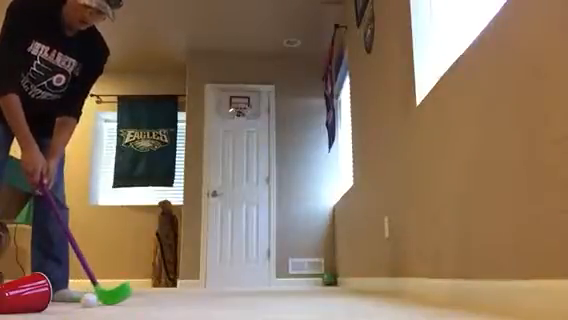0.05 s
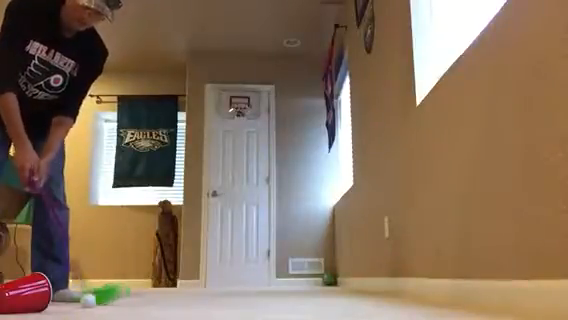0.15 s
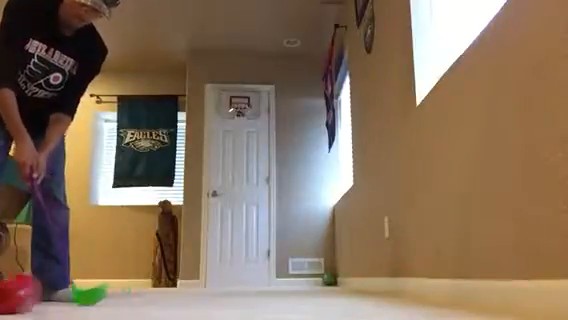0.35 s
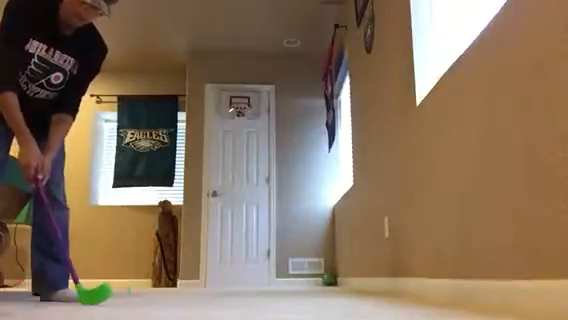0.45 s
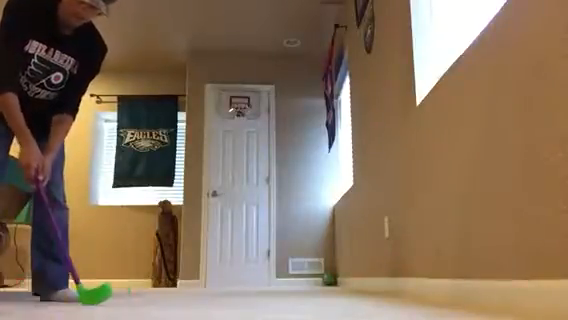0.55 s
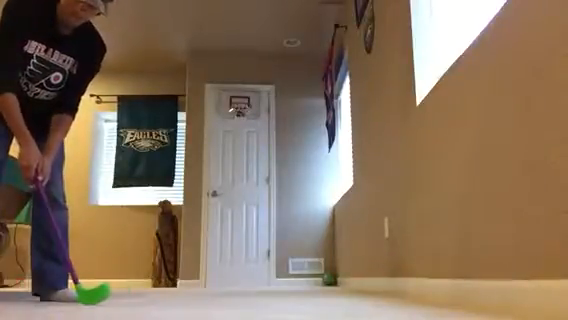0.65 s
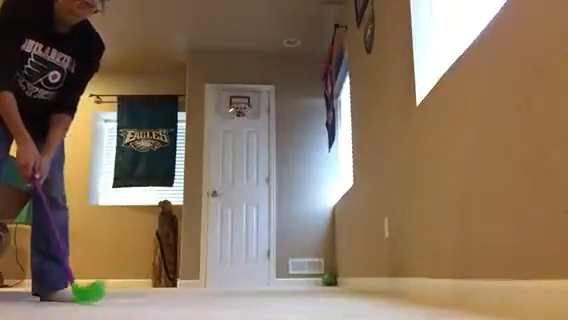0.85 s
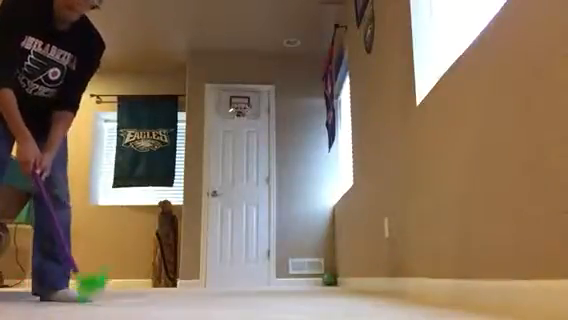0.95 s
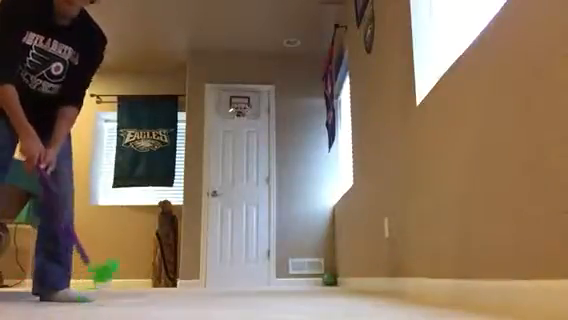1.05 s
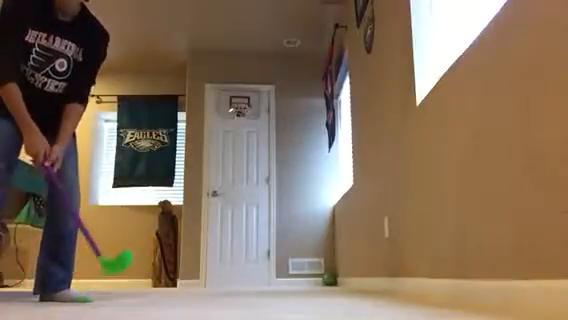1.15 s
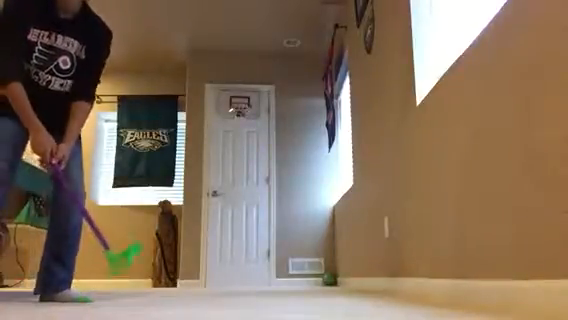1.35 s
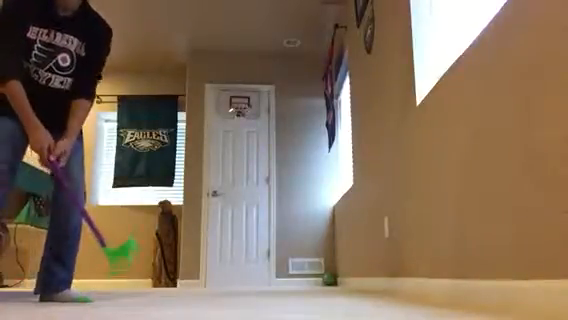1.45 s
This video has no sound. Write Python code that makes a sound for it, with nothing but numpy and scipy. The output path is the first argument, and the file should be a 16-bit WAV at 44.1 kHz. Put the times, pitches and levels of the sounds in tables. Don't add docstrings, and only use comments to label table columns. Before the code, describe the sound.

Hollow plastic ball knocks loudly into a plastic cup after a club tap, then rattles out

```python
import sys
import numpy as np
from scipy import signal
from scipy.fft import rfft, irfft, next_fast_len
from scipy.io import wavfile
from scipy.ndimage import map_coordinates

SR = 44100
rng = np.random.default_rng(int(sys.argv[2]) if len(sys.argv) > 2 else 0)


def file_out(sig):
    cols = np.atleast_2d(sig).T
    lim = np.clip(cols, -1, 1)
    pcm = np.round(lim * 32767).astype(np.int16)
    wavfile.write(sys.argv[1], SR, pcm)


def undo_db(level):
    steps = np.asarray(level, float) / 20
    return 10 ** steps


N = 66150
T = np.arange(N) / SR

# [t/s, air level/dB, rim level/dB, click level/dB, ring length factor]
KNOCKS = [
    (.3362, -9, -10, -27.5, 0.29),
    (.3438, -16, -15, -29.5, 0.3),
    (0.421, -12.5, -21, -29.5, 0.68),
    (0.4867, -14.5, -24.5, -31.5, 0.8),
    (.4985, -30, -62, -48, 1),
    (.535, -33, -41, -56, 0.96),
]
# [f/Hz, level/dB, t60/s]
CUP_AIR = [(262, -17.5, 0.052), (410, -19, .05), (718, 1, 0.065), (882, -22, 0.28)]
# [f/Hz, level/dB, t60/s]
RIM = [(1008, -11.5, 0.07), (1403, -15.5, 0.069), (1567, -23.5, 0.15), (1907, -21, 0.07),
       (2060, -23, 0.058), (2270, -24.5, 0.054),
       (1172, 1, .056), (1254, 0, .036),
       (2800, -24.5, .04), (3350, -23, .04)]
# [f/Hz, width/Hz, level/dB]
WALLS = [(300, 200, 4.5), (915, 230, 3), (1300, 360, 1.5), (1556, 120, 10), (2100, 540, -4),
         (3100, 500, -21)]
# [f/Hz, level/dB, t60/s]
PLASTIC = [(1010, 4, .04), (1190, 6, .04), (1960, 0, .08), (2105, 2, .13), (2256, 0, .11), (2950, -4, .18),
           (3289, -8, .08), (3950, -6, .07), (4258, -11, .1), (5350, -6, .06), (5850, -10, .08),
           (6508, -10, .11), (6850, -11, .08), (8800, -8, .045)]
# [f/Hz, level/dB]
CRACK = [(700, -27), (2000, -6), (4000, -2.5), (6000, 5), (9000, 2), (10300, -6.5), (12500, 1), (16000, -6)]
# [f/Hz, width/Hz, level/dB]
SHELL = [(2100, 110, 6.5), (3070, 730, 3), (3930, 1400, 3.5), (5604, 660, 3.5), (6770, 900, -0.5),
         (9330, 1200, -3.5), (12120, 2100, -7), (15200, 580, -14.5)]
# [t/s, body level/dB, click level/dB]
TAP = (.2352, -12.5, -25.5)
# [f/Hz, level/dB, t60/s]
CLUB = [(147.1, -20, 0.06), (250, -20, 0.05), (335, -19, 0.06), (511, -19, .09), (605, -1.5, 0.09),
        (904, -11, 0.035), (1500, -24, 0.03)]
# [f/Hz, level/dB, t60/s]
REBOUND = [(1410, 6.5, .015), (2300, -3, .012)]
# [f/Hz, width/Hz, level/dB]
CARPET = [(193, 150, 2), (423, 340, -6), (1420, 460, -11), (2150, 1600, -22)]
# [t/s, floor thump level/dB, air level/dB, rim level/dB, click level/dB]
BOUNCES = [(.677, -43, -46, -62, -60), (0.694, -42, -76, -71, -62), (0.7097, -65, -67, -59, -52),
           (.726, -64, -54, -56, -50), (0.7467, -66, -57, -72, -53.5), (.758, -47, -66, -62, -52.5),
           (.773, -57, -42, -54, -54.5), (0.779, -42, -56, -50, -63), (.802, -63, -38, -47, -47.5),
           (0.813, -60, -47, -48, -56), (.838, -46, -48, -54, -58), (0.847, -41.5, -68, -49, -76),
           (0.8645, -35, -37.5, -44.5, -47.5), (0.877, -39, -46, -46, -66), (.891, -48, -43, -46, -53),
           (0.902, -68, -46.5, -43, -59), (0.9215, -49, -48, -40.5, -54.5),
           (0.9304, -77, -32.5, -35.5, -44), (.941, -62, -36, -50, -48.5), (.949, -51, -38, -36.5, -70),
           (.962, -54, -48.5, -43.5, -76), (.988, -65, -56, -61, -68), (1.038, -61, -64, -72.5, -72),
           (1.3587, -61, -69, -60.5, -52)]
# [f/Hz, level/dB, t60/s]
THUMP = [(362, 0.0044, 0.02)]
# [f/Hz, level/dB, t60/s]
DAMPED_AIR = [(545.5, -11, 0.05), (645, -9, .05), (715, 2, 0.035)]
# [f/Hz, level/dB, t60/s]
DAMPED_RIM = [(1053, 0, 0.04), (1163, -0.5, 0.066), (1241, -3, 0.097), (1540, -11.5, 0.079),
              (2000, -19, 0.022), (2807, -14.5, 0.035)]
# [t/s, level/dB, t60/s]
FREE_AIR = [(.778, -41.5, 0.061), (.9415, -38, 0.14), (1.04, -56.5, 0.051)]
# [t/s, f/Hz, level/dB, t60/s]
TICKS = [(1.004, 14500, -66, .012), (1.004, 12000, -66, .012), (1.025, 6030, -56, 0.032),
         (1.358, 4710, -54.5, 0.046), (1.358, 3100, -57, 0.051)]
# [t/s, level/dB]
SCRAPE = [(0.6, -62.5), (0.76, -50), (0.828, -49), (0.896, -46.5), (.97, -54), (1.04, -79), (1.12, -81)]
# [f/Hz, width/Hz, level/dB]
HOLLOW = [(330, 33, 1), (548, 80, 0.5), (644, 19, 10), (1080, 780, -3), (1140, 160, 5), (1680, 447, -12),
          (1900, 230, -4)]
# [t/s, whistle level/dB, whistle f/Hz, hiss level/dB]
ROLL = [(1.0, -96, 2367, -90), (1.06, -68, 2390, -66.5), (1.111, -74, 2399, -65.5),
        (1.139, -61.5, 2470, -66), (1.23, -67.5, 2400, -69.5), (1.303, -71, 2450, -73.5),
        (1.38, -60.5, 2484, -63), (1.459, -70, 2640, -67.5), (1.5, -78, 2670, -74.5)]
# [f/Hz, width/Hz, level/dB]
BALL = [(2390, 560, 1.5), (3720, 540, 2.5), (5700, 820, -1), (8300, 790, -8), (11000, 900, -15)]
# [t/s, boom level/dB]
BOOM = [(0.0, -61.5), (0.136, -71), (0.242, -46), (0.312, -50.5), (0.408, -59), (0.426, -47), (0.5, -46),
        (0.614, -68), (0.714, -46.5), (0.93, -72), (1.002, -57), (1.026, -63), (1.214, -62), (1.256, -59),
        (1.282, -64), (1.424, -63), (1.454, -69.5), (1.5, -65)]
# [t/s, rise/s, t60/s, level/dB]
SCUFF = (1.358, .03, .3, -58)
# [f/Hz, level/dB per Hz]
SHOE = [(120, -42), (230, -16.5), (310, 1.5), (450, -6), (900, -12), (3000, -21), (6000, -17), (16000, -29)]
# [f/Hz, t60/s]
ROOM = [(100, 0.85), (500, 0.45), (2000, 0.5), (6000, 0.37), (14000, 0.2)]
# [f/Hz, level/dB per Hz]
HUSH = [(59, -44.5), (100, -13.5), (177, -29), (215, -4.5), (283, -17), (398, -15), (481, -21), (1830, -22),
        (16000, -32.5)]

RIM_LAG_S, RIM_RISE_S, RIM_CHOKE = 0.011, 0.0013, 1.084
AIR_LAG_S, AIR_RISE_S, AIR_CHOKE = 0.0013, 0.001, 1.15
AIR_HZ, AIR_T60_S = 539.3, 0.22
BUZZ_DB, BUZZ_T60_S = -21.5, 0.22
SCATTER_DB, PLASTIC_SCATTER_DB, RATTLE_SCATTER_DB = 1.3, 3.5, 2
PLASTIC_DB, FLECK_DB, FLECK_SHORTER = -5, -5.5, 0.42
CLICK_T60_S, FIZZ_T60_S, FIZZ_DB = 0.008, 0.15, -14
SOFT_HZ, HARD_HZ = 6000, 14000
DETUNE, FLUTTER_HZ = 0.02, 90
PUSH_HZ, PUSH_DB, PUSH_S, PUSH_PEAK_S, PUSH_LAG_S = 465, -10.5, 0.0016, 0.0023, 0.0029
THUD_DB, THUD_T60_S = -28, 0.17
BRUSH_S, BRUSH_DB = 0.013, -50
REBOUND_S, REBOUND_DB = 0.0113, -8
BUMP_DB, BUMPS_PER_S, SCRAPE_HISS_DB = 2.5, 110, -11
WHISTLE_WANDER_HZ = 420
BOOM_HZ, BOOM_SWAY_HZ = 75.05, 6
WALL_S, WALL_DB = 0.0113, -23.5
ROOM_DB, ROOM_RING_DB = -5, -9
HUSH_DB, TOP_HZ = -75, 16750


def unit(x):
    return x / np.sqrt(np.mean(x ** 2) + 1e-20)


def along(points, hz):
    f, v = np.transpose(points)
    return np.interp(np.log(hz + 1), np.log(f + 1), v)


def level(rows):
    s, db = np.transpose(rows)
    return undo_db(np.interp(T, s, db, left=-120, right=db[-1]))


def wobble(rate_hz):
    return map_coordinates(rng.standard_normal(int(N * rate_hz / SR) + 4), [T * rate_hz])


def filtered(x, response):
    m = next_fast_len(len(x) + 8192)
    return irfft(rfft(x, m) * response(np.fft.rfftfreq(m, 1 / SR)), m)[:len(x)]


def dull(x, hz):
    return filtered(x, lambda f: 1 / (1 + 1j * f / hz))


def resonant(peaks, order=1, size=N):
    def response(f):
        total = 0
        for k, (centre, width, db) in enumerate(peaks):
            damping = 1j * f * width
            total = total + (-1) ** k * undo_db(db) * damping / (centre * centre - f * f + damping)
        return total ** order
    return unit(filtered(rng.standard_normal(size), response))


def coloured(spectrum, size=N):
    return unit(filtered(rng.standard_normal(size), lambda hz: undo_db(along(spectrum, hz))))


def ringing(modes, rise_s, choke, scatter_db=SCATTER_DB, detune=0, flutter=0):
    t = T[:SR // 4, None]
    hz, db, t60 = np.transpose(modes)
    scatter, shift = rng.standard_normal((2, len(hz)))
    knots = rng.standard_normal((FLUTTER_HZ, len(hz)))
    knot_at = np.arange(FLUTTER_HZ)
    shake = np.transpose([np.interp(t[:, 0] * FLUTTER_HZ, knot_at, k - k[0]) for k in knots.T])
    wave = np.sin(2 * np.pi * hz * (1 + detune * shift) * t + flutter * shake)
    wave = wave * (1 + flutter * shake[:, ::-1] / 3)
    decay = undo_db(db + scatter_db * scatter - 60 * (t / t60) ** choke)
    return (decay * wave).sum(1) * (1 - np.exp(-t[:, 0] / rise_s))


def add(track, s, sound):
    track[round(s * SR):][:len(sound)] += sound


def click():
    t = T[:SR // 4]
    crack = coloured(CRACK, size=len(t))
    fizz = resonant(SHELL, order=2, size=len(t))
    return crack * undo_db(-60 * t / CLICK_T60_S) + fizz * undo_db(FIZZ_DB - 60 * t / FIZZ_T60_S)


def knocks():
    out = np.zeros(2 * N)
    for s, air_db, rim_db, click_db, longer in KNOCKS:
        add(out, s, undo_db(click_db) * dull(click(), HARD_HZ))
        plastic = ringing(PLASTIC, 0.0008, 0.75, PLASTIC_SCATTER_DB, 0.004, flutter=1.3)
        add(out, s, undo_db(click_db + PLASTIC_DB) * plastic)
        buzz_gain = undo_db(air_db + BUZZ_DB - 60 * T / BUZZ_T60_S) * (1 - np.exp(-T / 0.0065))
        add(out, s, buzz_gain * resonant(WALLS))
        air = ringing(CUP_AIR, AIR_RISE_S, 0.88)
        air = air + ringing([(AIR_HZ, -2, AIR_T60_S * longer)], AIR_RISE_S, AIR_CHOKE)
        add(out, s + AIR_LAG_S, undo_db(air_db) * air)
        rim = ringing(RIM, RIM_RISE_S, RIM_CHOKE)
        add(out, s + RIM_LAG_S, undo_db(rim_db) * rim)
    return out[:N]


def tap():
    out = np.zeros(2 * N)
    s, body_db, click_db = TAP
    thud = resonant(CARPET) * undo_db(THUD_DB - 60 * T / THUD_T60_S) * (1 - np.exp(-T / 0.00067))
    push = -undo_db(PUSH_DB) * np.cos(2 * np.pi * PUSH_HZ * (T - PUSH_LAG_S))
    push = push * np.exp(-((T - PUSH_PEAK_S) / PUSH_S) ** 2)
    brush = undo_db(BRUSH_DB) * resonant(HOLLOW) * (T < BRUSH_S) * np.sqrt(T / BRUSH_S)
    add(out, s - BRUSH_S, brush)
    add(out, s, push + thud)
    add(out, s, undo_db(body_db) * ringing(CLUB, 0.0036, 1) + undo_db(click_db) * click())
    touch = click() + undo_db(12) * ringing(REBOUND, 0.0017, 0.93)
    add(out, s + REBOUND_S, undo_db(click_db + REBOUND_DB) * touch)
    return out[:N]


def rattle():
    out = np.zeros(2 * N)
    flecks = np.array(PLASTIC[2:]) * [1, 1, FLECK_SHORTER]
    for s, thump_db, air_db, rim_db, click_db in BOUNCES:
        for modes, db in (THUMP, thump_db), (DAMPED_AIR, air_db), (DAMPED_RIM, rim_db):
            add(out, s, undo_db(db) * ringing(modes, 1 / 1200, 1.046, RATTLE_SCATTER_DB, DETUNE))
        add(out, s, undo_db(click_db + 6.0) * dull(dull(click(), SOFT_HZ), SOFT_HZ))
        fleck = ringing(flecks, 0.0016, 0.77, 2 * RATTLE_SCATTER_DB, DETUNE)
        add(out, s, undo_db(click_db + FLECK_DB) * fleck)
    for s, db, t60 in FREE_AIR:
        add(out, s, ringing([(AIR_HZ, db, t60)], 0.0035, 1.1))
    for s, hz, db, t60 in TICKS:
        add(out, s, ringing([(hz, db, t60)], 0.0005, 0.97, flutter=0.91))
    return out[:N]


def scraping():
    fade = np.clip((SCRAPE[-1][0] + 0.019 - T) / 0.077, 0, 1)
    friction = resonant(HOLLOW) + undo_db(SCRAPE_HISS_DB) * resonant(SHELL[:4])
    bumps = undo_db(BUMP_DB * wobble(BUMPS_PER_S) - 5.5)
    return friction * bumps * level(SCRAPE) * fade


def rolling():
    s, tone_db, hz, hiss_db = np.transpose(ROLL)
    phase = 2 * np.pi * np.cumsum(np.interp(T, s, hz)) / SR
    whistle = wobble(WHISTLE_WANDER_HZ) * np.cos(phase) + wobble(WHISTLE_WANDER_HZ) * np.sin(phase)
    hiss = resonant(BALL) * undo_db(wobble(24))
    return whistle * level(np.c_[s, tone_db]) + hiss * level(np.c_[s, hiss_db])


def feet():
    s, rise_s, t60, db = SCUFF
    rise = np.exp(np.minimum(T - s, 0) / rise_s) * 0.66
    fall = undo_db(-60 * np.maximum(T - s, 0) / t60)
    scuff = undo_db(db) * np.where(T < s, rise, fall) * coloured(SHOE)
    sway_hz = BOOM_SWAY_HZ * wobble(12)
    boom = np.sin(2 * np.pi * np.cumsum(BOOM_HZ + sway_hz) / SR) * undo_db(2.5 + 1.0 * wobble(18))
    rumble = undo_db(-2.0) * resonant([(64.7, 32, 0)])
    return scuff + level(BOOM) * (boom + rumble)


def room(x):
    out = np.zeros(N + 2 * SR)
    add(out, WALL_S, undo_db(WALL_DB) * filtered(x, lambda f: 1j * f / (1500 + 1j * f)))
    fed = filtered(x, lambda f: np.interp(f, [1500, 2500], undo_db([ROOM_RING_DB, 0])))
    hop = SR // 12
    for start in range(0, N, hop):
        hz, t, z = signal.stft(rng.standard_normal(SR * 3 // 4), SR, nperseg=256)
        decay = undo_db(-60 * t / along(ROOM, hz)[:, None])
        tail = signal.istft(z * decay, SR, nperseg=256)[1]
        answer = signal.fftconvolve(fed[start:start + hop], tail / np.linalg.norm(tail))
        add(out, start / SR + 0.006, undo_db(ROOM_DB) * answer)
    return out[:N]


def still_air():
    return undo_db(HUSH_DB) * coloured([(40, -47.5), *HUSH])


def scene():
    hits = knocks() + tap() + rattle()
    return (hits + room(hits) + scraping() + rolling() + feet() + still_air())[None]


def low_pass(x):
    return signal.sosfilt(signal.butter(12, 16790, fs=SR, output="sos"), x)


def record(dry):
    def band(f):
        bass_cut = (1j * f / (48 + 1j * f)) ** 2
        return bass_cut * (f < TOP_HZ) / (1 + (f / 15700) ** 30)
    mix = filtered(dry[0], band)[None]
    return low_pass(mix)


dry = scene()
out = record(dry)
file_out(out)
```